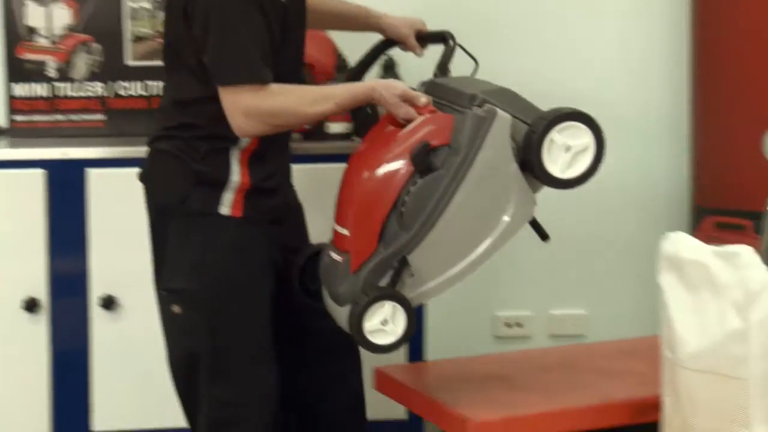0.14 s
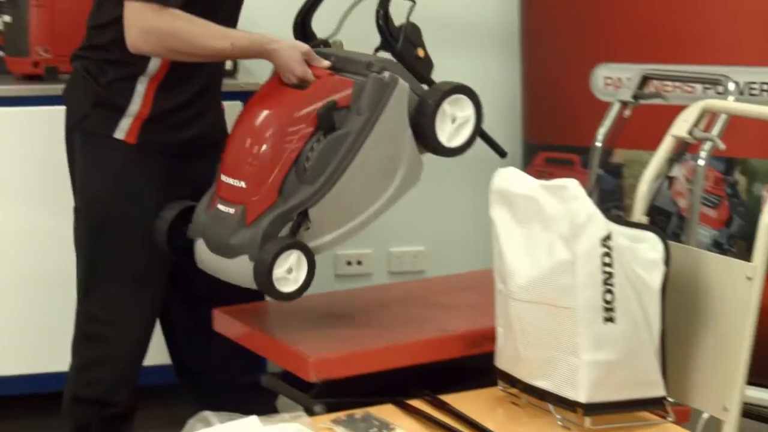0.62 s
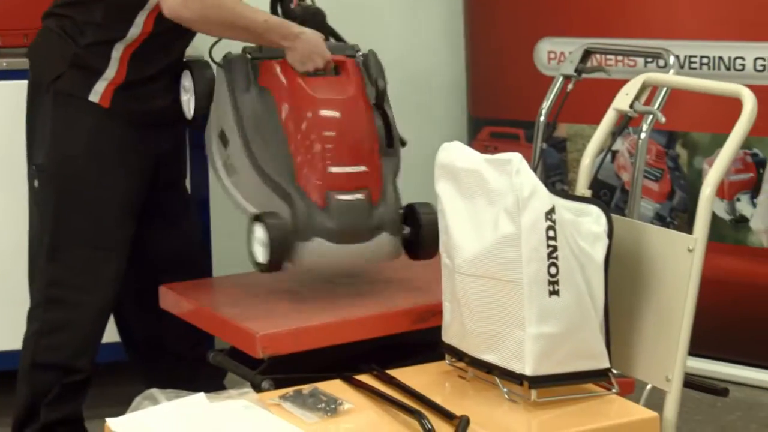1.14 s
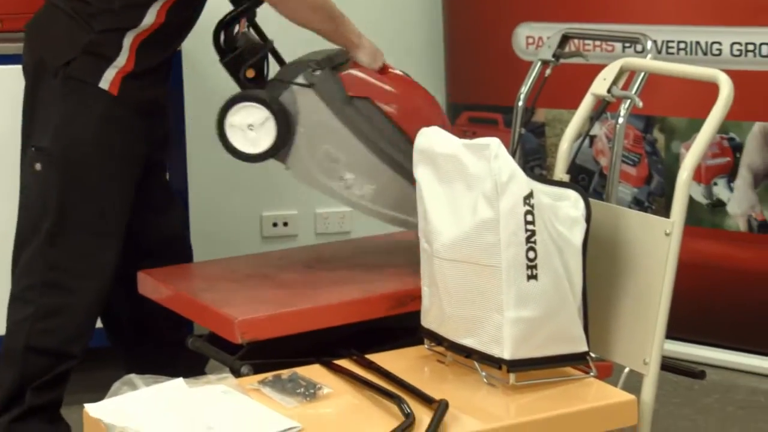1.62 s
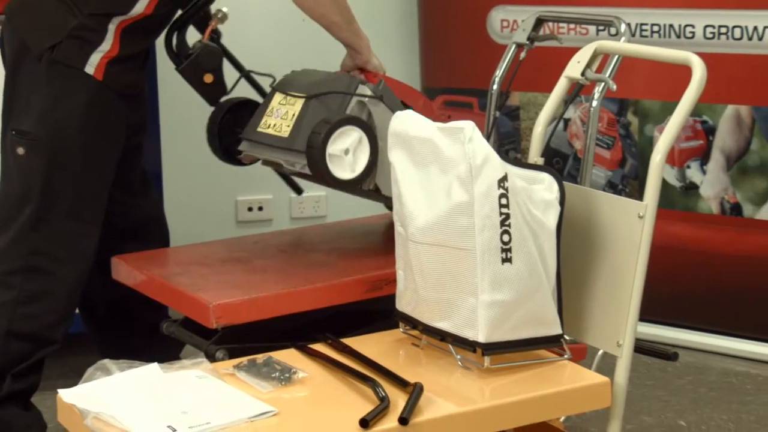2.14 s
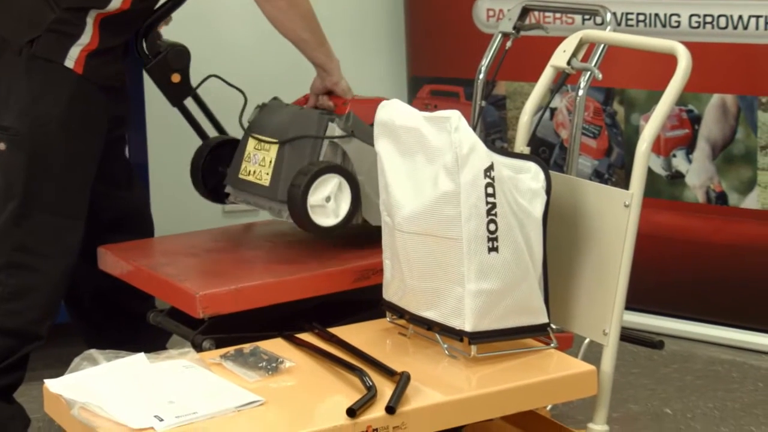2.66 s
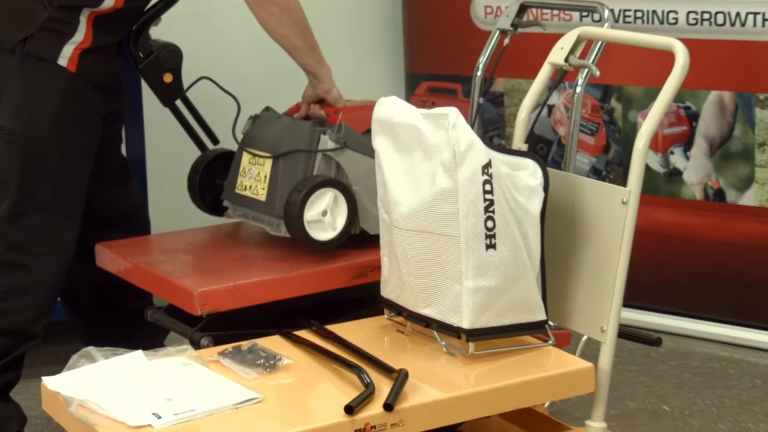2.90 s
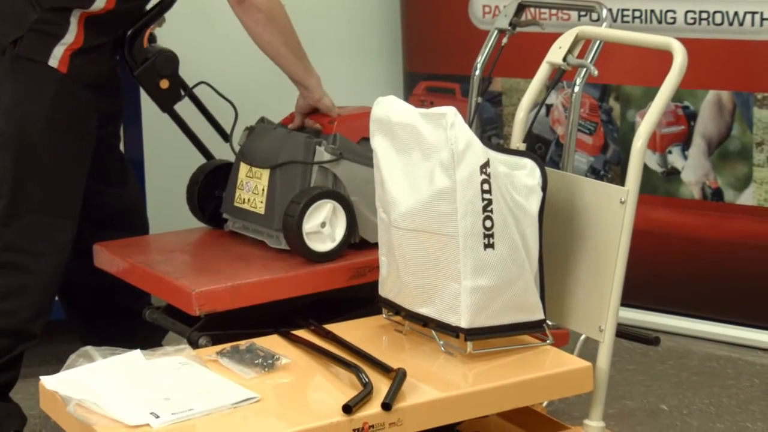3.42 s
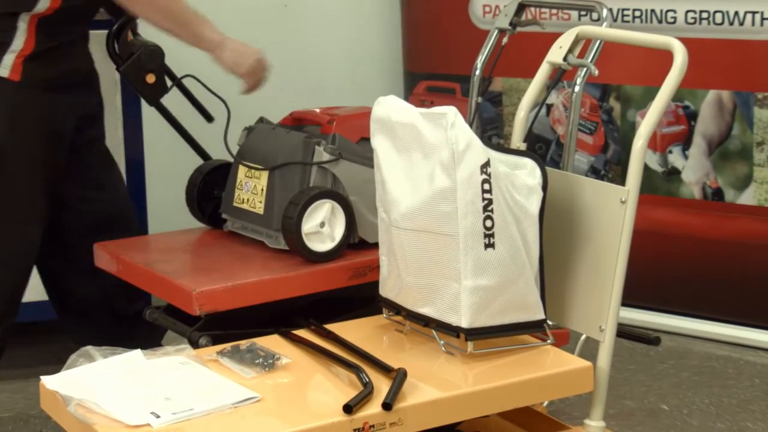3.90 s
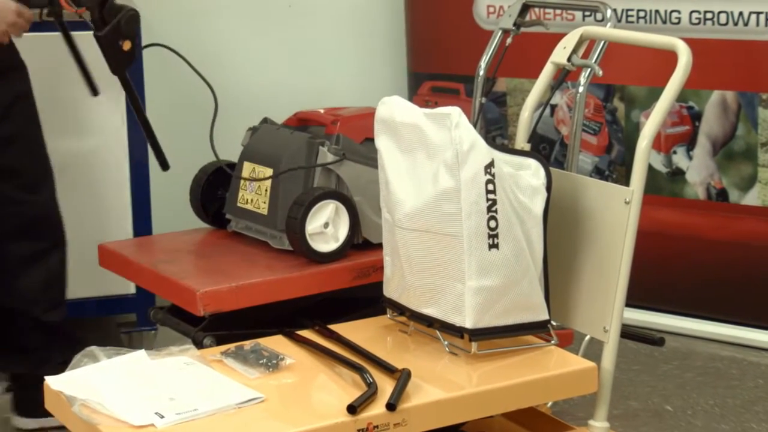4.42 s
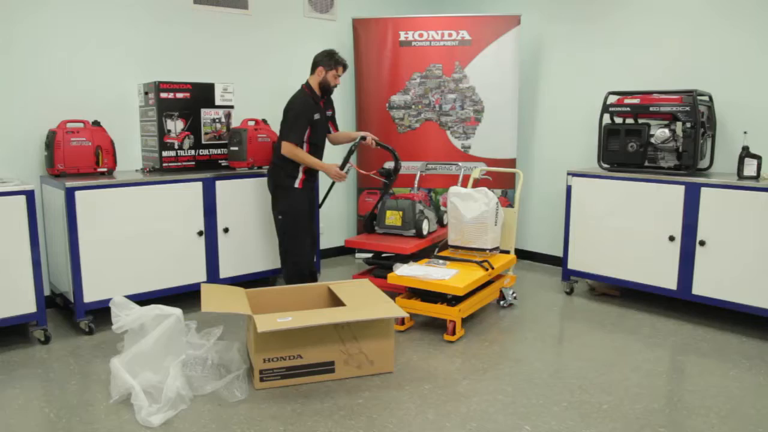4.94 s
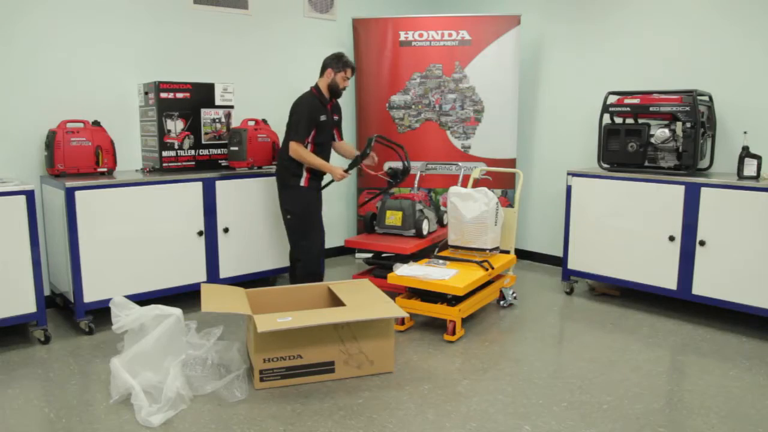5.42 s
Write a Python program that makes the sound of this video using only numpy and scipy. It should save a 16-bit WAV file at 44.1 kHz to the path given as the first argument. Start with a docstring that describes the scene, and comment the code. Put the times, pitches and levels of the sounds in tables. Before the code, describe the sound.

Hollow plastic thuds of a mower landing on a workbench ring through a hard room, followed by shoe scuffs, a sole slap and faint metallic ticking.

```python
"""A lawnmower is set down on a table in a hard-walled workshop, over rumble, mains hum and microphone hiss.
A shoe scuff is under way at the start; then heavy blows make the plastic housing knock and the room boom.
Knocks and rebounds fall with and between them, two more scuffs follow, a sole slaps the floor and the loose
handle tube rattles to the end, with a few last knocks. Noise and dying sines make the sounds; all but the
booms and the air pass through a room of noisy reflections."""
import sys
import numpy as np
from scipy import signal
from scipy.fft import rfft, irfft
from scipy.io import wavfile
from scipy.ndimage import uniform_filter1d

SR = 44100
rng = np.random.default_rng(int(sys.argv[2]) if len(sys.argv) > 2 else 0)


def wav_record(signal):
    """Record a signal, one row per channel, as 16-bit PCM in the file named by sys.argv[1]."""
    frames = np.transpose(np.atleast_2d(signal))
    bounded = np.clip(frames, -1, 1)
    # unit amplitude maps onto the largest positive 16-bit level
    quanta = np.round(bounded * 32767).astype(np.int16)
    wavfile.write(sys.argv[1], SR, quanta)


def volts_from_decibels(level):
    """Turn decibel levels (scalar or array-like) into linear amplitude factors."""
    exponent = np.asarray(level, float) / 20
    return 10 ** exponent


N = 245195  # length in samples
TAIL = 52000  # length of the room's answer in samples
SHORT_TIME = np.arange(TAIL // 4) / SR  # seconds, for sounds before the room answers


def evened(x):
    """Scales to rms 1."""
    return x / np.sqrt(np.mean(x ** 2) + 1e-20)


def read(points, hz):
    """Joins (Hz, value) points on a log-frequency axis."""
    f, value = np.transpose(points)
    return np.interp(np.log(hz + 1), np.log(f + 1), value)


def add(mix, s, sound):
    """Mixes a sound in at s seconds."""
    part = mix[round(s * SR):][:len(sound)]
    part += sound[:len(part)]


def coloured(x, points):
    """Filters x by a (Hz, dB) spectrum."""
    gain = volts_from_decibels(read(points, np.fft.rfftfreq(len(x), 1 / SR)))
    return irfft(rfft(x) * gain, len(x))


def resonate(x, hz, width_hz):
    """Shifts the curve hz down to zero, smooths, and shifts back: a resonance of gain 1."""
    turn = np.exp(2j * np.pi * np.cumsum(hz * np.ones(len(x))) / SR)
    r = np.exp(-np.pi * width_hz / SR)
    return 2 * (turn * signal.lfilter([1 - r], [1, -r], x / turn)).real


def ring(hz, db, t60):
    """Adds up sines of random sign, each dying by 60 dB in t60 seconds."""
    sign = rng.choice([-1., 1.], hz.shape)
    level = volts_from_decibels(db - 60 * SHORT_TIME / t60)
    return (sign * level * np.sin(2 * np.pi * hz * SHORT_TIME)).sum(0)


def burst(points, rise, fall):
    """A short spray of coloured noise; rise and fall are time constants in seconds."""
    noise = evened(coloured(rng.standard_normal(len(SHORT_TIME)), points))
    return noise * (1 - np.exp(-SHORT_TIME / rise)) * np.exp(-SHORT_TIME / fall)


def struck(x, tilt_db, spots_hz, lift_db, spot_octaves):
    """Tilts the sound brighter or duller with the blow's hardness and lifts the parts nearest the blow."""
    hz = np.clip(np.fft.rfftfreq(len(x), 1 / SR), 300, 8000)
    db = tilt_db * np.log2(hz / 1000)
    for f in spots_hz:
        db = db + lift_db * np.exp(-(np.log2(hz / f) / spot_octaves) ** 2)
    folded = irfft(db * np.log(10) / 20, len(x))  # minimum phase: nothing sounds before the blow
    folded[1:len(x) // 2] *= 2
    folded[len(x) // 2 + 1:] = 0
    return irfft(rfft(x) * np.exp(rfft(folded)), len(x))


def peaked(x, peak_db):
    """Sets the loudest 10 ms to the level of a sine with this peak."""
    return x * volts_from_decibels(peak_db) / np.sqrt(2 * uniform_filter1d(x ** 2, size=441).max())


# How each band of the room's sound builds up and dies: (pitch_hz, t60_s = time to die by 60 dB, buildup_s)
ROOM_BANDS = [(151, 0.32, 0.06), (280, 0.86, 0.0063), (600, 0.62, 0.0077), (1180, 0.55, 0.0038),
              (2400, 0.51, 0.0067), (4800, 0.44, 0.0045), (9000, 0.48, 0.0013), (14800, 0.37, 0.0015)]


def workshop(x, direct_db=-5.0, near_gain=2.53):
    """Direct sound, strong near reflections and a tail dying band by band, in a new random pattern each call."""
    taps = np.zeros(TAIL)
    at = np.arange(40, TAIL - 20, 20) + rng.integers(0, 20, (TAIL - 41) // 20)  # one reflection per 20 samples
    taps[at] = rng.choice([-1., 1.], len(at))
    hz, t60, rise = np.transpose(ROOM_BANDS)[:, :, None]
    bins_hz = np.fft.rfftfreq(TAIL, 1 / SR)
    shares = [read(np.c_[hz, row], bins_hz) for row in np.eye(len(ROOM_BANDS))]  # overlapping bands
    bands = irfft(rfft(taps) * shares, TAIL)
    t = np.arange(TAIL) / SR
    near = 1 + near_gain * np.exp(-t / 0.012)  # table, cabinets and the close wall
    tail = near * (bands * volts_from_decibels(-60 * t / t60) * (1 - np.exp(-t / rise))).sum(0)
    tail /= np.linalg.norm(tail)
    tail[0] = volts_from_decibels(direct_db)
    return signal.fftconvolve(x, tail)


# Spectrum of the steady hiss and rumble noise, before the drift below 130 Hz:
# (pitch_hz, level_db per Hz, relative)
AIR_SPECTRUM = [(8, -35), (14, 6.5), (42, -7.5), (90, 1), (112, -13.5), (150, -9), (200, -28), (300, -18.5),
                (420, -25.5), (570, -26.5), (1000, -29), (2000, -31), (6000, -33), (16000, -34)]
# Low rumble resonances: (pitch_hz, width_hz, level_db before the shift and drift below 130 Hz)
RUMBLE_RESONANCES = [(45.8, 11, -66.5), (73.2, 4.3, -67)]
# Mains hum and its overtones: (pitch_hz, level_db rms)
HUM_TONES = [(100, -67.5), (200, -81), (300, -78.5), (400, -84)]


def air():
    """Coloured noise for hiss, resonant noise for low rumble with slight random level drift, sines for hum."""
    t = np.arange(N) / SR
    bed = volts_from_decibels(-61.5) * evened(coloured(rng.standard_normal(N), AIR_SPECTRUM))
    for hz, width_hz, db in RUMBLE_RESONANCES:
        bed += volts_from_decibels(db) * evened(resonate(rng.standard_normal(N), hz, width_hz))

    low = signal.sosfiltfilt(signal.butter(2, 130, fs=SR, output="sos"), bed)
    drift = np.zeros(N)
    for f in np.geomspace(0.3, 2.5, num=12):  # rates in Hz, random phases
        drift += np.sin(2 * np.pi * (f * t + rng.random())) / np.sqrt(f)
    shift_db, depth_db = -3.5, -0.5
    bed += low * (volts_from_decibels(shift_db + depth_db * evened(drift)) - 1)

    for hz, db in HUM_TONES:
        waver = 1 + 0.054 * evened(uniform_filter1d(rng.standard_normal(N), size=8000))
        bed += volts_from_decibels(db) * np.sqrt(2) * waver * np.sin(2 * np.pi * (hz * t + rng.random()))
    return bed


# Shoe strokes sliding on a hard surface; a start below zero is already under way:
# (start_s, length_s, top_db before the room, start_hz)
SCUFF_STROKES = [(-.07, 0.17, -63.5, 2880), (3.073, 0.17, -68, 3320), (3.199, .17, -69, 2970)]


def scuff(start, length, top_db, start_hz):
    """Friction noise through a wide, falling resonance and a higher one; each stroke swells and fades."""
    t = np.arange(max(-start, 0), length, 1 / SR)
    ends_db, sag_hz_per_s = -15, 3000
    level_db = top_db + ends_db * (2 * t / length - 1) ** 2
    hz = start_hz - sag_hz_per_s * t
    grit = np.diff(rng.standard_normal(len(t) + 1))
    main = resonate(resonate(grit, hz, 2400), hz, 2400)
    overtone = volts_from_decibels(-19.0) * resonate(grit, 1.9 * hz, 1400)
    return max(start, 0), workshop(volts_from_decibels(level_db) * evened(main + overtone), direct_db=-0.53)


# Heavy blows on the housing, with hardness as tilt and the two nearest panels:
# (start_s, peak_db before each contact's own level, settle_s, tilt_db per octave, panel_hz, next_hz)
HEAVY_BLOWS = [(0.672, -30, .03, 1.25, 514, 628), (1.476, -30.5, .02, 2, 606, 2600),
               (1.651, -38, .009, 0.5, 870, 1580), (2.507, -30, .025, 0.53, 1350, 1660)]
# A blow lands as touch, impact and chatter: (share of the settling time, level_db added to the blow's)
BLOW_CONTACTS = [(0, -7.5), (0.302, 1.5), (.5, -4.5), (1, -7.5)]


def blow(peak_db, settle, *colour):
    """A heavy blow is several contacts in quick succession."""
    out = np.zeros(2 * TAIL)
    for share, db in BLOW_CONTACTS:
        add(out, share * settle, knock(peak_db + db, *colour, lift_db=6))
    return out


# Booms set off by the weight of a blow: (start_s, peak_db, favoured_hz)
BOOM_STARTS = [(0.676, -35.5, 257), (0.75, -40.5, 268), (1.2, -60, 345), (1.48, -43, 278),
               (1.652, -37.5, 297), (1.72, -45, 260), (2.512, -33.5, 250.6), (3.975, -70, 345)]
# Low room modes: (pitch_hz, level_db before the favoured ones are lifted, t60_s = time to die by 60 dB)
BOOM_MODES = [(164.2, -7.5, 0.55), (202, -1, 0.64), (214.4, -7, 1), (239.6, -1.5, 0.71), (261.3, -9, 0.93),
              (281.6, -4, 0.78), (311.6, -12.5, 1), (345, -6, 0.75), (395, -5, 0.47)]


def thump(peak_db, centre_hz):
    """Low modes start together with alternate signs, beat, sag after the first swell and die."""
    hz, db, t60 = np.transpose(BOOM_MODES)[:, :, None]
    db = db + 9.5 * np.exp(-(np.log2(hz / centre_hz) / 0.21) ** 2)  # lifts modes near the favoured pitch
    t = np.arange(TAIL) / SR
    sign = (-1) ** np.arange(len(hz))[:, None]
    phase = 0.22 * rng.standard_normal(hz.shape)  # in cycles
    boom = (sign * volts_from_decibels(db - 60 * t / t60) * np.sin(2 * np.pi * (hz * t + phase))).sum(0)
    rise = (1 - np.exp(-t / 0.0096)) ** 2
    first_swell = 1 + 3.3 * np.exp(-t / 0.024)
    return peaked(boom * rise * first_swell, peak_db)


# Lighter knocks, rebounds and extra contacts within blows, one contact per row, with the two nearest panels:
# (start_s, peak_db, tilt_db per octave, panel_hz, next_hz)
KNOCK_CONTACTS = [(0.751, -46.5, -1.8, 540, 1410), (1.171, -49.5, -10, 474, 1100),
                  (1.185, -56.5, 1.5, 526, 400), (1.54, -40.5, -12, 630, 2600),
                  (1.654, -33.5, 4, 4300, 5460), (1.689, -36.5, -1, 682, 3270), (2.044, -52, 4, 1180, 1530),
                  (2.048, -58, 4, 2600, 5130), (2.507, -32, 0.5, 967, 2140), (2.6, -40, -4.5, 685, 1620),
                  (2.856, -56, -1, 726, 570), (2.872, -64, -4, 930, 560), (2.928, -63, 2.5, 695, 980),
                  (3.438, -65.5, -7, 345, 1000), (5.356, -63, 1, 730, 1800), (5.408, -60, 0, 940, 1940),
                  (5.447, -75, -3, 910, 600)]
# Ringing panels of the plastic housing, before tilt and lift: (pitch_hz, level_db)
HOUSING_PANELS = [(450, -1.5), (630, 0.5), (750, 1), (860, -10.5), (990, 2.5), (1170, -6), (1330, -3),
                  (1620, 4), (1870, -9), (2120, 2.5), (2600, -18), (3300, -3.5), (3950, -4.5), (4400, 1.5),
                  (4790, -13), (5800, -15), (6800, -54), (7700, -43)]
# Steel parts that ring longer, before tilt and lift: (pitch_hz, level_db, t60_s = time to die by 60 dB)
STEEL_PARTS = [(622, -29.5, 0.87), (766, -15, 0.56), (870, -27.5, 0.59), (1140, -18.5, 0.094),
               (1620, -17, 0.18), (1830, -25, 0.47), (2600, -37, 0.066), (4400, -20.5, 0.051)]
# Small parts too dense to tell apart: (pitch_hz, level_db per Hz, relative)
SMALL_PARTS = [(150, -8.5), (300, -8.5), (700, 2), (1500, -8), (2500, -10), (3200, -14.5), (4500, -23),
               (6000, -28.5), (9000, -35.5), (16000, -43)]


def knock(peak_db, tilt_db, panel_hz, next_hz, lift_db=9):
    """Plastic panels ring briefly and steel parts longer, amid a noisy clatter of small parts."""
    hz, db = np.transpose(HOUSING_PANELS)[:, :, None]
    panels = ring(hz, db, 22 / hz)  # plastic dies by 60 dB in 22 cycles
    steel = ring(*np.transpose(STEEL_PARTS)[:, :, None])
    clatter = volts_from_decibels(8.5) * burst(SMALL_PARTS, rise=0.00038, fall=0.0046)
    hit = struck(panels + steel + clatter, tilt_db, (panel_hz, next_hz), lift_db, spot_octaves=0.15)
    return peaked(workshop(hit), peak_db)


# A sole meets the floor: (start_s, peak_db, contact_s = time constant of the fading puff)
SOLE_SLAPS = [(3.961, -60, 0.0068), (3.977, -45.5, 0.0099), (4.04, -55.5, 0.0013)]
# Spectrum of the puff: (pitch_hz, level_db per Hz, relative)
SOLE_SPECTRUM = [(150, -40), (250, -10), (347, -4), (405, -32), (482, 5), (563, -12), (823, -2.5),
                 (1290, -17), (1700, -6.5), (4710, -5), (15500, -20.5)]


def slap(peak_db, contact):
    """A flat contact: a noise burst for a puff of squeezed air, with no ring."""
    return peaked(workshop(burst(SOLE_SPECTRUM, 0.15 * contact, contact)), peak_db)


# The handle tube ticks against its mount, favouring two modes:
# (start_s, peak_db, tilt_db per octave, mode_hz, next_hz)
TUBE_TICKS = [(4.244, -56, -0.5, 1820, 2500), (4.251, -54.5, -2.5, 4150, 970), (4.329, -49, 4, 3390, 4930),
              (4.411, -64, -1, 1910, 1900), (4.424, -55, -0.5, 2500, 4150), (4.6, -65.5, -4, 1770, 960),
              (4.771, -69, 5, 2410, 1850), (4.959, -71, 2, 1600, 4000), (5.08, -68, -2, 1950, 2480),
              (5.489, -70.5, 1.5, 2440, 5000)]
# Ringing modes of the tube, before tilt and lift: (pitch_hz, level_db)
TUBE_MODES = [(520, -16), (947, -13), (1850, 0.5), (2510, 0), (3440, -2), (3740, 0), (4090, -2.5),
              (4930, -13), (5600, -29), (7200, -17), (8600, -25)]


def rattle(peak_db, tilt_db, mode_hz, next_hz):
    """A tick of noise and the short ring of the hand-damped tube."""
    hz, db = np.transpose(TUBE_MODES)[:, :, None]
    tube = ring(hz, db, 42 / hz)  # the tube dies by 60 dB in 42 cycles
    tick_spectrum = [(500, -12), (2000, -5.0), (5000, -17.5), (16000, -29)]  # (Hz, dB per Hz)
    tick = volts_from_decibels(4.0) * burst(tick_spectrum, rise=0.00027, fall=0.0039)
    hit = struck(tube + tick, tilt_db, (mode_hz, next_hz), lift_db=9.5, spot_octaves=0.13)
    return peaked(workshop(hit, direct_db=-7.0, near_gain=3.5), peak_db)


def scene():
    """Lays the scuffs, blows, booms, knocks, slaps and rattles over the room air."""
    mix = air()
    for row in SCUFF_STROKES:
        add(mix, *scuff(*row))
    sources = ((HEAVY_BLOWS, blow), (BOOM_STARTS, thump), (KNOCK_CONTACTS, knock),
               (SOLE_SLAPS, slap), (TUBE_TICKS, rattle))
    for table, source in sources:
        for start_s, *how in table:
            add(mix, start_s, source(*how))
    return mix[None]


def band_limit(x):
    """A steep low-pass at the top of the band."""
    return signal.sosfilt(signal.butter(12, 16380, fs=SR, output="sos"), x)


def record(dry):
    """Cuts the treble above 15850 Hz with a steep filter to finish the mix."""
    low_pass = signal.firwin(255, 15850, fs=SR)
    finished = signal.oaconvolve(dry, low_pass[None], "same")
    return band_limit(finished)


dry = scene()
out = record(dry)
wav_record(out)
```